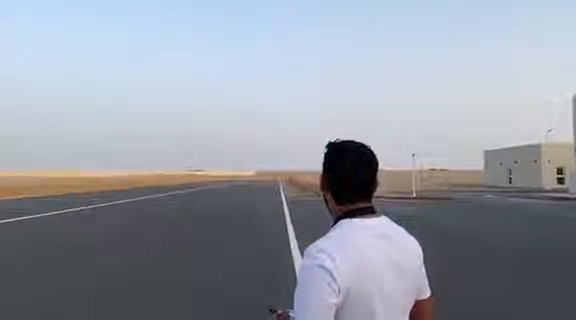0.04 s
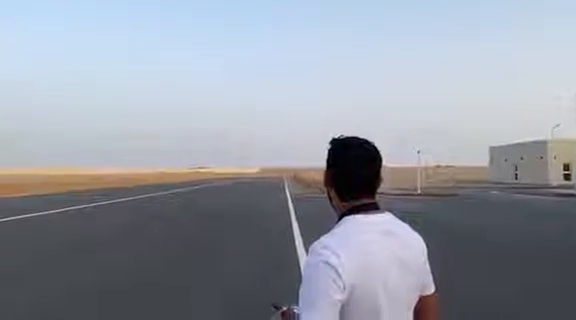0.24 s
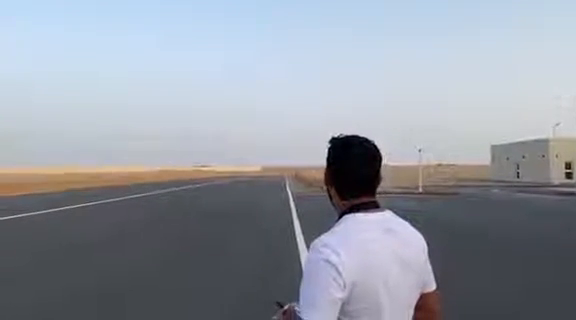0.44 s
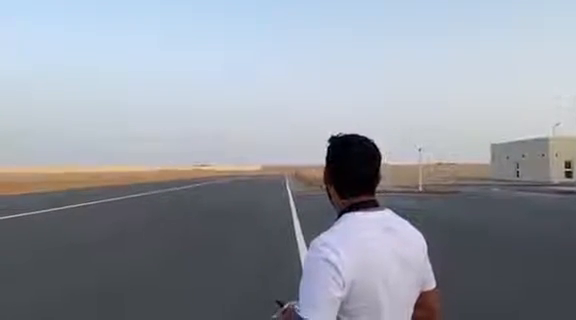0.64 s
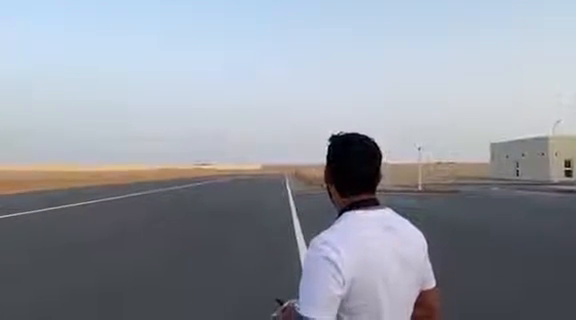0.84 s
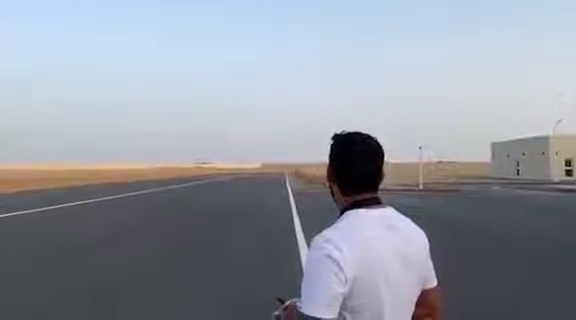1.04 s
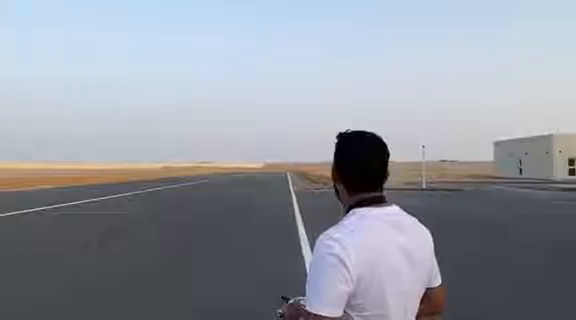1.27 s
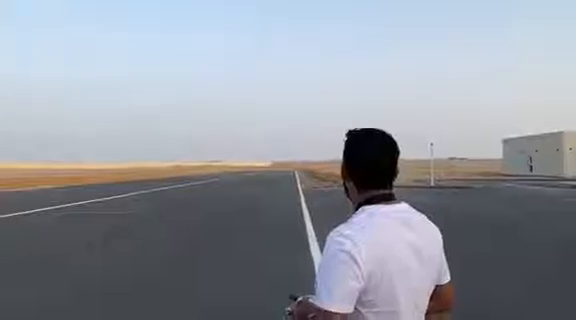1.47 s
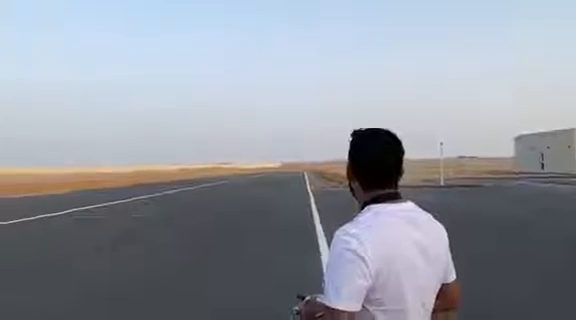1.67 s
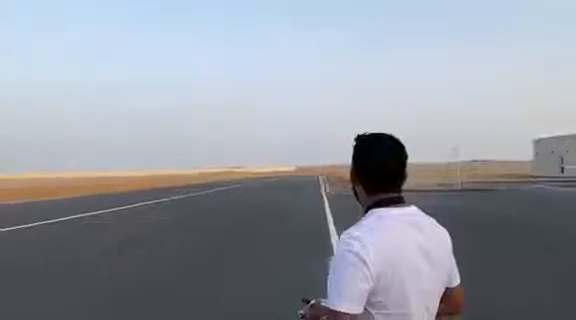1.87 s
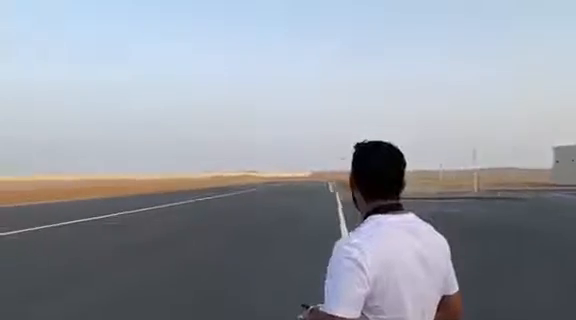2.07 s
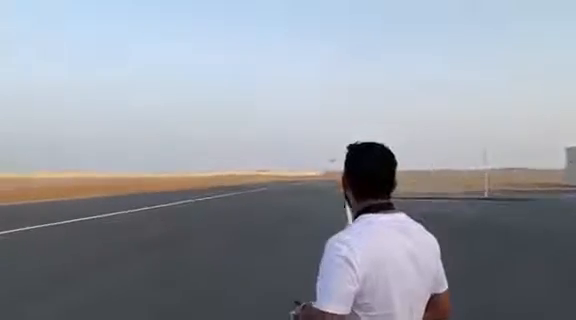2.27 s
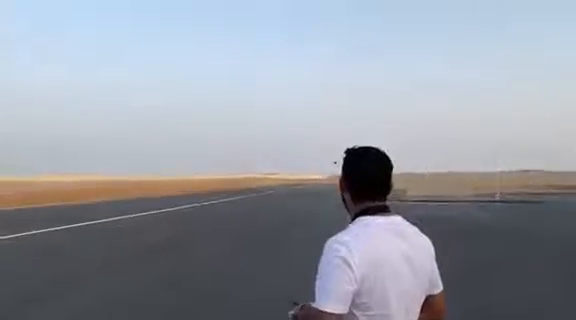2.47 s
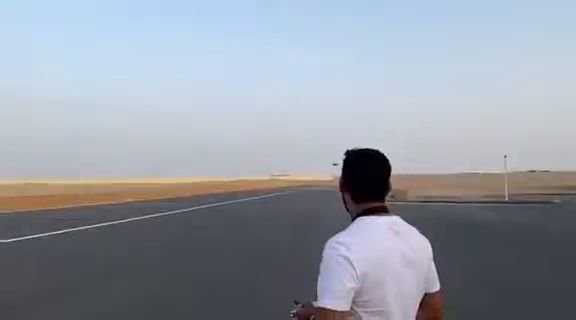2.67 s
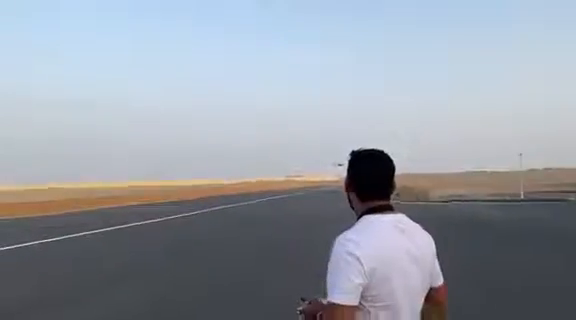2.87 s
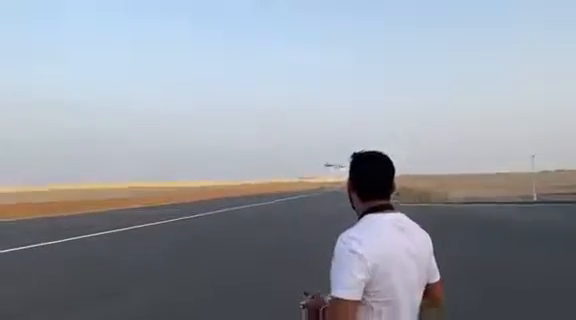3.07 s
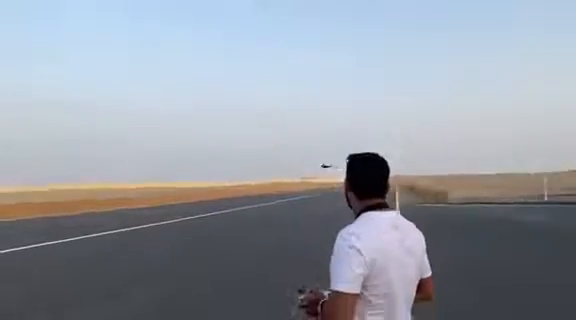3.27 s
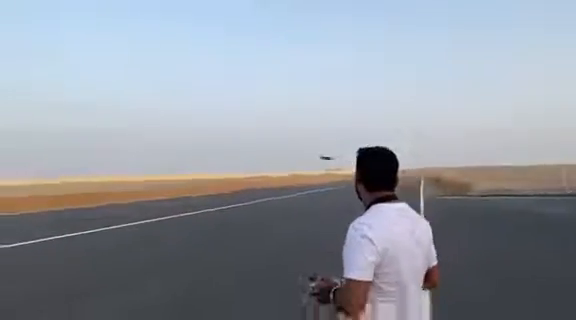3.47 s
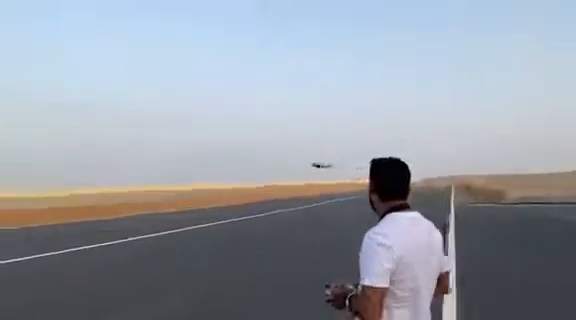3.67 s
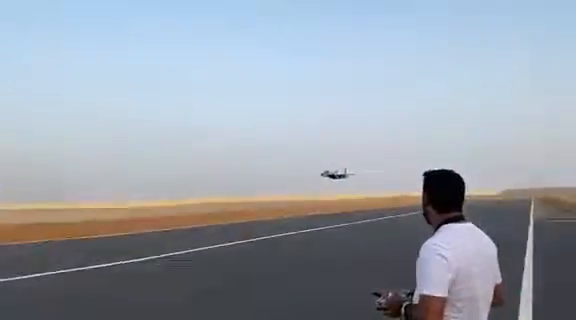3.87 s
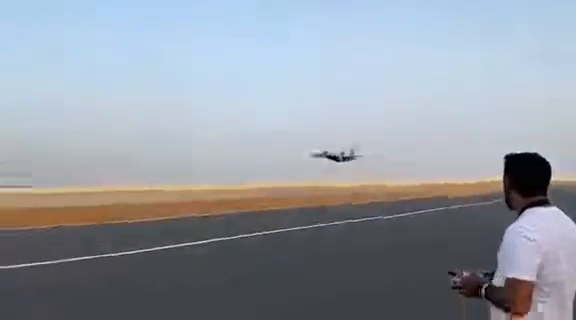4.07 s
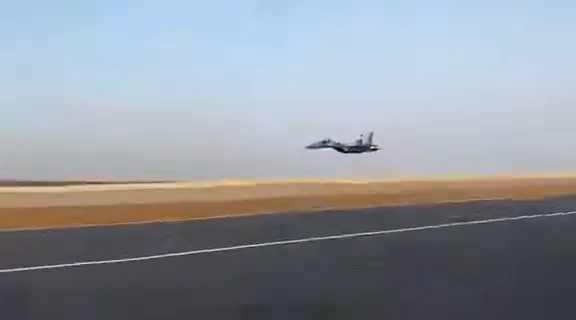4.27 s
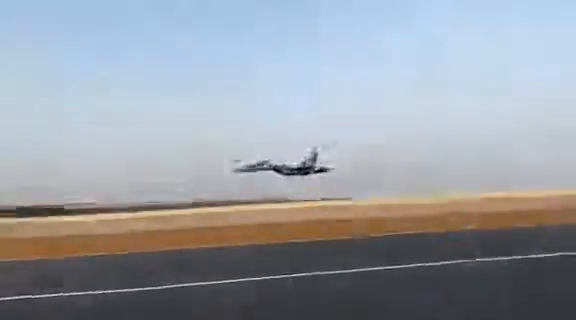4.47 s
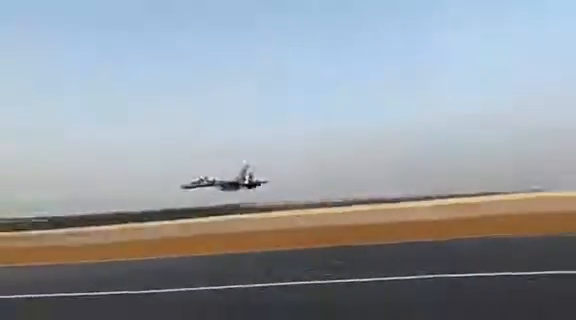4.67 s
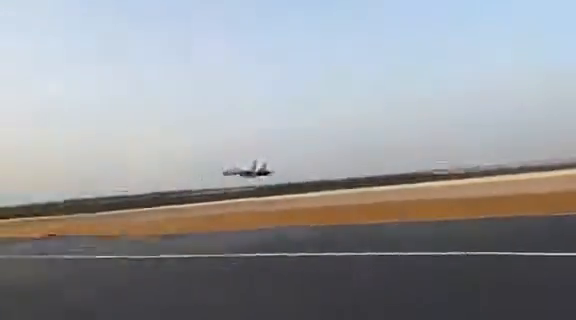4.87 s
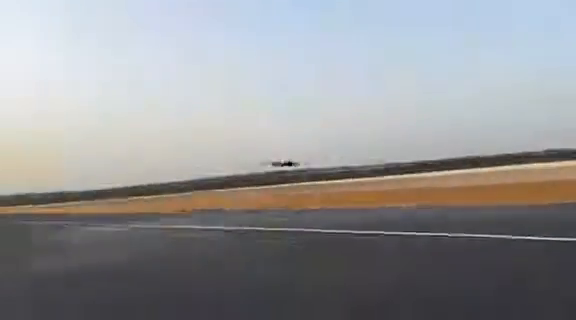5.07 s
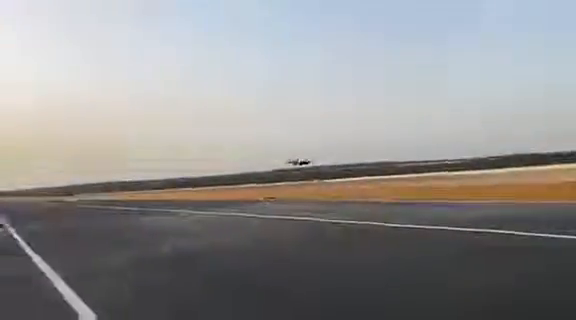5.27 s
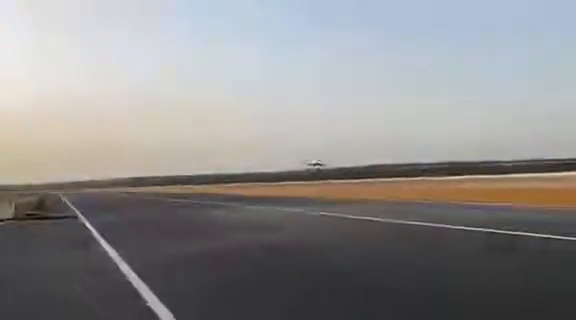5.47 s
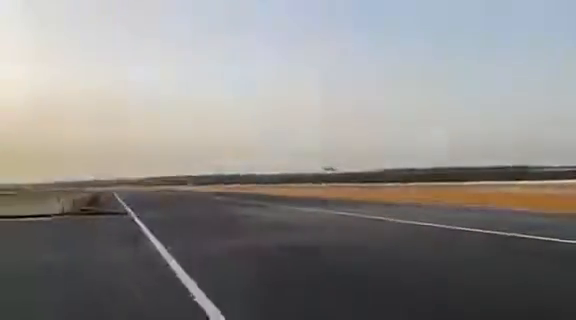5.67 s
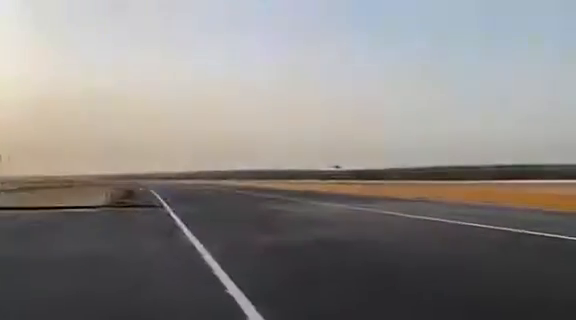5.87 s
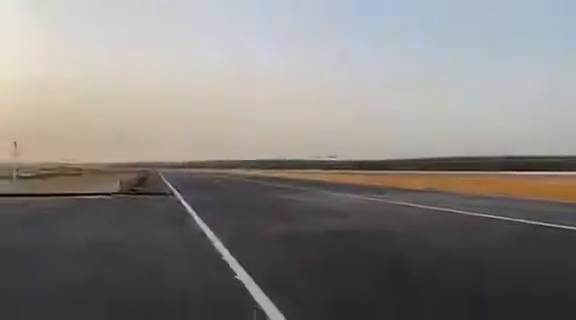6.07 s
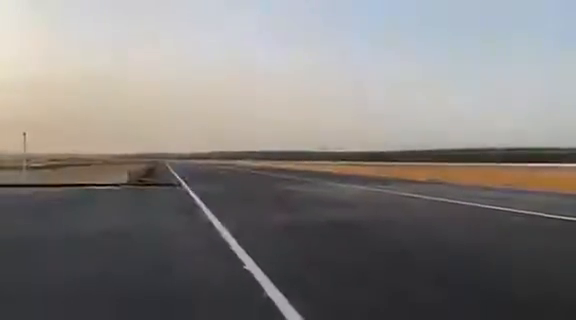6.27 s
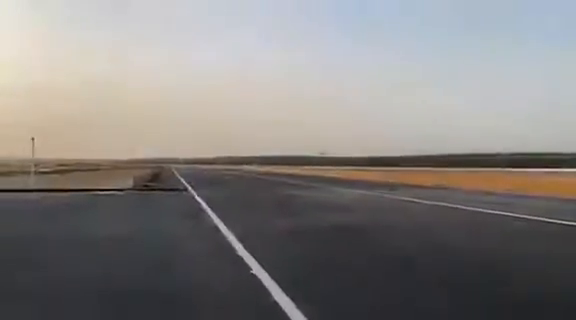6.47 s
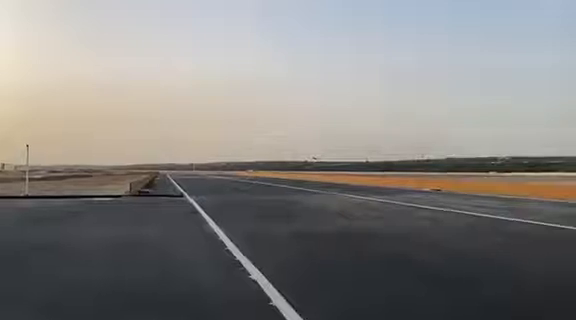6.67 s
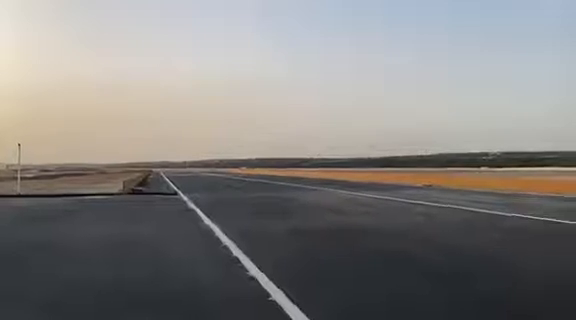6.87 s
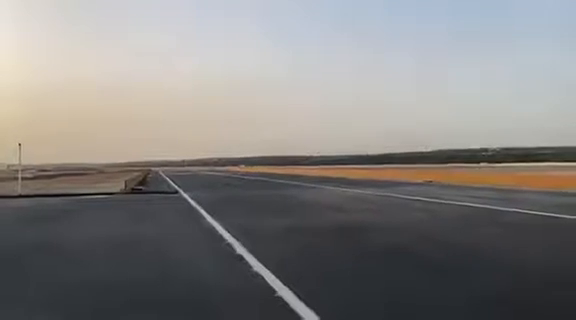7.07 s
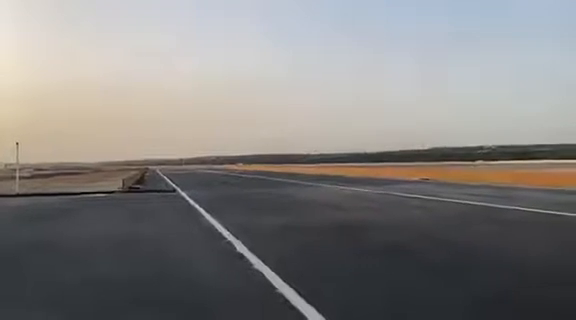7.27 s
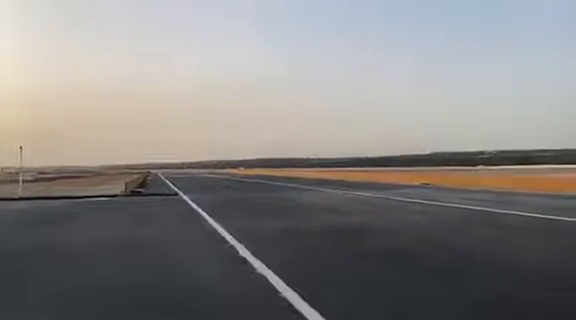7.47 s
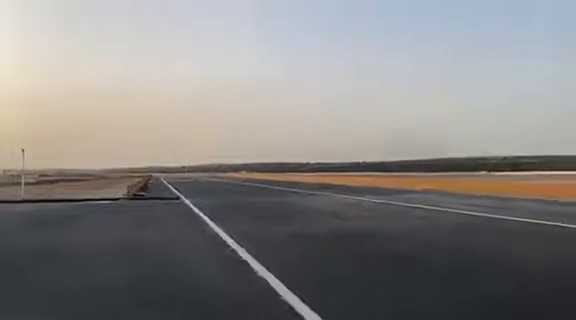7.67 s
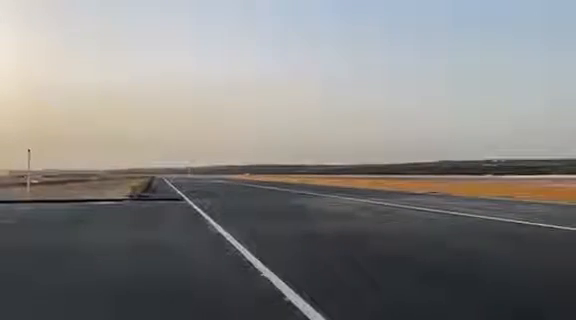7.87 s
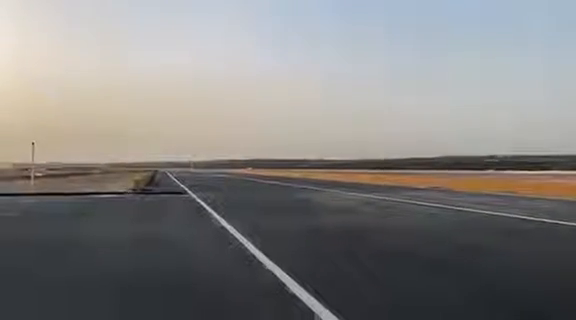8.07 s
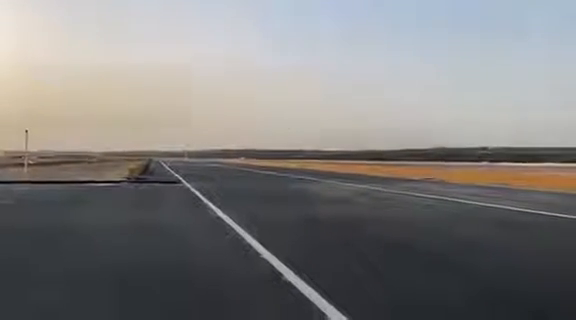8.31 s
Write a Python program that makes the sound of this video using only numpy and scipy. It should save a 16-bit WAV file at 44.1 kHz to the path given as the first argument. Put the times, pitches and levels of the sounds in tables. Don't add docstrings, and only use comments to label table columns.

```python
import sys
import numpy as np
from scipy import signal
from scipy.fft import dct
from scipy.io import wavfile
from scipy.ndimage import uniform_filter1d, map_coordinates

SR = 44100
rng = np.random.default_rng(int(sys.argv[2]) if len(sys.argv) > 2 else 0)


def digitize_waveform(pressure):
    field = np.atleast_2d(pressure).T
    bounded = np.clip(field, -1, 1)
    quanta = np.round(bounded * 32767).astype(np.int16)
    wavfile.write(sys.argv[1], SR, quanta)


def invert_db(x):
    u = np.asarray(x, float) / 20
    return 10 ** u


N = 367794


def rms_one(x):
    return x / np.sqrt(np.mean(x ** 2) + 1e-20)


def in_time(rows):
    s, *columns = np.transpose(rows)
    return [np.interp(np.arange(N) / SR, s, column) for column in columns]


def drift(rate_hz):
    coarse, run_in = 40, 2000
    r = np.exp(-2 * np.pi * rate_hz * coarse / SR)
    noise = rng.standard_normal(N // coarse + run_in + 2)
    slow = signal.lfilter([1], [1, -2 * r, r * r], noise)[run_in:]
    return np.interp(np.arange(N) / coarse, np.arange(len(slow)), rms_one(slow))


def band(x, low_hz, high_hz):
    return signal.sosfilt(signal.butter(2, [low_hz, high_hz], "band", fs=SR, output="sos"), x)


def patchy_noise(colour, low_hz, high_hz, slow_db, fast_db):
    count = int(np.ceil(3 * np.log2(high_hz / low_hz)))
    edges = np.geomspace(low_hz, high_hz, 1 + count)
    white, out = rng.standard_normal((2, N)), 0
    hz, db = np.transpose(colour)
    for k, (low, high) in enumerate(zip(edges, edges[1:])):
        level_db = np.interp(np.log(low * high) / 2, np.log(hz), db)
        flicker_db = slow_db * drift(5.2) + fast_db * drift(23)
        out = out + invert_db(level_db + flicker_db) * band(white[k % 2], low, high)
    return rms_one(out)


# frequency in Hz, density in dB per Hz.
WIND_SPECTRUM = [(15, -42), (25, -16.5), (45, -4), (75, 3), (129, -3), (168, -11.5), (300, -43), (390, -45),
                 (660, -120)]
# time in seconds, level in dB.
BREEZE_LEVEL = [(0, -46), (1.5, -48.5), (2.0, -54), (2.6, -49.5), (3.9, -44.5), (5.0, -46.5), (6.3, -42.5),
                (8.34, -46)]
# time of the peak in seconds, peak level in dB.
GUST_PEAKS = [(0.0, -36), (.23, -37.5), (.37, -40), (.49, -36.5), (.76, -39), (.88, -37), (.99, -38),
              (1.11, -36.5), (1.46, -40), (1.86, -42), (2.42, -37.5), (3.14, -41.5), (3.48, -44),
              (4.04, -40.5), (4.27, -39), (4.5, -41), (5.13, -39.5), (5.55, -49), (5.85, -45), (6.079, -36),
              (6.2, -36), (7.15, -44), (7.55, -44), (7.69, -39.5), (7.87, -35), (8.06, -34), (8.18, -48),
              (8.27, -46)]
GUST_RISE_S, GUST_FALL_S = 0.037, .06


def gust_envelope():
    peak_s, peak_db = np.transpose(GUST_PEAKS)[:, :, None]
    since = np.arange(N) / SR - peak_s
    shapes = np.exp(-np.abs(since) / np.where(since < 0, GUST_RISE_S, GUST_FALL_S))
    return (invert_db(peak_db) * shapes).max(axis=0)


def wind():
    gusts = gust_envelope()
    strength = np.hypot(invert_db(in_time(BREEZE_LEVEL)[0]), gusts)
    rumble = strength * patchy_noise(WIND_SPECTRUM, 25, 302, slow_db=-2.0, fast_db=-2.5)
    flap = rms_one(band(rng.standard_normal(N), 145, 480))
    return rumble + invert_db(-11) * gusts * flap


# start in seconds, peak in dB, pitch in Hz, 60 dB decay time in seconds.
GUST_THUMPS = [(0.051, -40, 87, 0.037), (0.218, -21, 138, 0.078), (0.354, -28.5, 71, 0.15),
               (0.466, -21, 69, 0.037), (0.489, -24, 82.5, 0.081), (0.722, -28.5, 200, 0.051),
               (1.102, -36, 94, 0.078), (1.139, -17.5, 68, 0.051), (1.189, -23, 67, 0.046),
               (2.419, -22, 140, 0.075), (6.101, -15, 294, 0.057)]


def gust_thumps():
    t = np.arange(int(.2 * SR)) / SR
    out = np.zeros(N)
    for s, db, hz, t60 in GUST_THUMPS:
        puff = rms_one(band(rng.standard_normal(len(t)), 125, 430))
        swing = np.sin(2 * np.pi * hz * t) + 0.44 * puff
        onset, decay = 1 - np.exp(-t / .004), invert_db(-60 * t / t60)
        at = round(s * SR)
        out[at:at + len(t)] += invert_db(db - 1.0) * onset * decay * swing
    return out


SPEED, SLOWING, NEAREST_M, NEAREST_S, SOUND = 44.4, 2.885, 18.08, 4.589, 343


def flight_path():
    u = np.arange(-7, 6, .001)
    along = SPEED * u - SLOWING * u * u / 2
    metres = np.hypot(along, NEAREST_M)
    heard = NEAREST_S + u + (metres - NEAREST_M) / SOUND
    doppler = np.gradient(u, heard)
    return in_time(np.c_[heard, metres, -along / metres, doppler, u])


# time in seconds, height in m, echo strength 0-1, treble share left 0-1.
ASPHALT_ECHO = [(0, 22.4, 0.35, 0), (.7, 14.9, 0.29, 0.04), (1.8, 4.74, 0.24, 0.14), (2.6, 3.3, 1, .6),
                (3.1, 3.48, 1, 0.65), (3.9, 3.15, .45, 0.2), (4.25, 3.2, .45, .5), (4.5, 3.05, 0.8, 0.2),
                (5.0, 3.16, 0.9, .65), (5.7, 3.6, .55, .15), (6.7, 4.47, 0.75, 0.4), (7.6, 5.2, 0.43, 0),
                (8.34, 9.3, 0.7, 0.47)]


def off_asphalt(x, split_hz, shimmer_ms):
    mic_height_m = 1.5
    height, strength, treble = in_time(ASPHALT_ECHO)
    lag_ms = 2000 * height * mic_height_m / (flight_path()[0] * SOUND)
    lag_ms = lag_ms + shimmer_ms * drift(6)
    echo = map_coordinates(x, [np.arange(N) - lag_ms * SR / 1000], order=3, mode="nearest")
    low = signal.sosfiltfilt(signal.butter(2, split_hz, fs=SR, output="sos"), echo)
    reflected = low + np.clip(treble, 0, .75) * (echo - low)
    return (x + np.clip(strength, 0, .66) * reflected) / np.sqrt(1.5)


# centre in seconds, half length in seconds, centre in Hz, width in Hz, level in
# dB.
ROAR_SWELLS = [(0.857, 0.18, 5750, 1130, -58.5), (1.35, 0.22, 5600, 1700, -54),
               (1.568, 0.11, 4180, 1040, -45.5), (2.028, 0.089, 2430, 1200, -41.5),
               (2.978, 0.091, 4900, 790, -43), (3.335, 0.18, 480, 217, -36),
               (3.897, 0.15, 255, 90, -29), (3.861, 0.26, 393, 159, -30.5),
               (4.499, 0.38, 362, 125.7, -27), (3.05, 0.2, 2000, 510, -47),
               (3.953, 0.13, 1090, 360, -34.5), (4.243, 0.32, 2960, 802, -31),
               (4.41, 0.3, 211.5, 81.5, -24.5), (4.502, .2, 720, 255, -21.5),
               (4.805, 0.23, 1452, 327, -25.5), (4.809, 0.1, 5180, 1600, -34.5),
               (4.909, 0.083, 2060, 583, -27), (4.912, 0.061, 183, 87, -29.5),
               (5.702, 0.28, 2295, 890, -41), (7.804, .5, 190.6, 113, -41.5),
               (6.496, 0.76, 1898, 379, -39.5), (6.613, 0.13, 3500, 2970, -38),
               (7.22, 0.038, 3500, 3700, -37.5), (7.7, 0.6, 5690, 813, -48)]


def swells():
    t, white, out = np.arange(N) / SR, rng.standard_normal(N), 0
    for s, half, hz, width_hz, db in ROAR_SWELLS:
        bell = np.exp(-((t - s) / half) ** 2)
        out = out + invert_db(db) * bell * rms_one(band(white, hz - width_hz / 2, hz + width_hz / 2))
    return out


# frequency in Hz, density in dB per Hz.
JET_SPECTRUM = [(59, -34), (100, -13), (291, -6), (403, -9), (688, -4), (1070, -1), (1270, -7), (1530, -7),
                (1890, -8.5), (2570, -18), (3910, -14.5), (5830, -18.5), (6290, -19), (7330, -22.5),
                (9580, -52), (12500, -82), (21100, -120)]
PART_EDGES_HZ = 130, 450, 2300, 5300, 7600, 10500
# time in seconds, roar in dB as at the nearest distance, brightness in dB.
ENGINE_EFFORT = [(0, -21.5, -15.5), (.6, -22.5, -2), (1.1, -20.5, -3.5), (1.55, -19.5, -4),
                 (2.05, -18.5, 5), (2.8, -21, 2.5), (3.35, -17.5, 0.5), (3.8, -21.5, 4.5), (4.2, -21, 0.5),
                 (4.55, -20, 0.5), (4.92, -17.5, 5), (5.12, -17.5, -1), (5.6, -19.5, -1), (6.3, -18, 0.5),
                 (6.62, -14.5, 0), (7.2, -14, 2.5), (7.75, -15.5, 0), (8.34, -13.5, 5.5)]
# level in dB against the roar, air loss in dB per 100 m,
# dB louder ahead than abeam, share of the brightness.
JET_PARTS = [
    (-11.5, -2, -2, .1),
    (0, 0.5, 0.5, 0),
    (-10, 0.5, 0, 0.73),
    (-12.5, 9.5, 1.5, 1.4),
    (-20, 16.5, 6, 0.79),
]


def jet_noise():
    metres, ahead, _, _ = flight_path()
    roar_db, bright_db = in_time(ENGINE_EFFORT)
    roar_db = roar_db - 20 * np.log10(metres / NEAREST_M)
    slow_dbs, fast_dbs = [2.1, 0.3, 0.52, 0.24, 0.24], [1.1, 0.51, 1.8, 2.7, 1.8]
    out = 0
    for part, low, high, slow, fast in zip(JET_PARTS, PART_EDGES_HZ, PART_EDGES_HZ[1:], slow_dbs, fast_dbs):
        db, loss, lobe, share = part
        level_db = roar_db + db - loss * metres / 100 + lobe * ahead + share * bright_db
        out = out + invert_db(level_db) * patchy_noise(JET_SPECTRUM, low, high, slow, fast)
    return out


def tone(hz, db, wobble_hz, twinkle_db):
    phase = 2 * np.pi * np.cumsum(hz + wobble_hz * drift(15)) / SR
    return np.sqrt(2) * invert_db(db + twinkle_db * drift(10)) * np.sin(phase)


# time in seconds, shaft level in dB, blade level in dB.
FIRST_ENGINE = [(0, -74, -105), (1.7, -64, -88), (2.55, -58, -83), (3.4, -61, -75), (3.78, -46, -68),
                (4.2, -42, -51), (4.5, -39, -46), (4.8, -38, -46), (5.15, -43, -47), (5.4, -62, -50),
                (5.55, -70, -58), (5.75, -80, -55), (6.2, -100, -80), (6.4, -130, -130)]


def first_turbine():
    blade_per_shaft, beat_hz, beat_db, crest_s = 3.775, 3.2, 3.5, 4.5
    metres, _, doppler, since = flight_path()
    shaft_db, blade_db = in_time(FIRST_ENGINE)
    blade_hz = (8266.5 + 52.9 * since) * doppler
    beat = np.cos(2 * np.pi * beat_hz * (np.arange(N) / SR - crest_s))
    shaft_db = shaft_db + beat_db * np.sqrt(NEAREST_M / metres) * beat
    return tone(blade_hz / blade_per_shaft, shaft_db + 3, 5, 2) + tone(blade_hz, blade_db, 13, 3)


# time in seconds, pitch in Hz.
SECOND_SHAFT_PITCH = [(1.7, 2525), (1.95, 2498), (2.2, 2483)]
# time in seconds, level in dB.
SECOND_SHAFT_LEVEL = [(1.6, -80), (1.85, -60), (1.95, -62), (2.08, -49), (2.2, -60), (2.3, -86)]
# time in seconds, pitch in Hz.
SECOND_BLADE_PITCH = [(5.7, 7710), (6.1, 7680), (6.24, 7730), (6.31, 7822), (6.45, 8170), (6.59, 8620),
                      (6.73, 9200), (6.85, 9700)]
# time in seconds, level in dB.
SECOND_BLADE_LEVEL = [(5.6, -130), (5.75, -75), (5.88, -64), (6.1, -70), (6.35, -66), (6.5, -65),
                      (6.66, -59), (6.75, -63), (6.85, -130)]


def second_turbine():
    shaft = tone(*in_time(SECOND_SHAFT_PITCH), *in_time(SECOND_SHAFT_LEVEL), 4.6, 2.2)
    blade = tone(*in_time(SECOND_BLADE_PITCH), *in_time(SECOND_BLADE_LEVEL), 12, 3)
    return shaft + blade


def scene():
    roar = off_asphalt(jet_noise() + swells(), split_hz=1900, shimmer_ms=.02)
    return (wind() + gust_thumps() + roar + first_turbine() + second_turbine())[None]


# time in seconds, share turned away 0-1.
HANDSET_TURN = [
    (4.0, 0),
    (5.3, 1),
]
# frequency in Hz, width in Hz, depth facing 0-1, depth turned away 0-1.
PORT_RESONANCES = [(856, 83, 0.43, 0.39), (1003.5, 250, 0.078, 0.37), (1865, 420, 0.2, 0.011),
                   (2232, 330, 0.073, 0.24), (2844, 230, 0.53, 0.29), (3283, 360, 0.35, .5),
                   (4740, 580, 0.017, 0.22), (5317, 740, 0.76, 0.32), (6090, 360, 0.35, 0.67),
                   (8190, 800, 0.37, 0.27)]


def port(x):
    turned = np.clip(in_time(HANDSET_TURN)[0], 0, 1)
    for hz, width_hz, facing, away in PORT_RESONANCES:
        r = np.exp(-np.pi * width_hz / SR)
        poles = [1, -2 * r * np.cos(2 * np.pi * hz / SR), r * r]
        ring = signal.lfilter(np.array([1, 0, -1]) * (1 - r * r) / 2, poles, x)
        depth = np.clip(facing + turned * (away - facing) + .15 * drift(2.5), 0, .75)
        x = x - depth * ring
    return x


# frequency in Hz, dB under the loudest band, dB under the neighbouring bands.
STEP_DEPTH = [(250, 60, 14), (600, 60, 1), (1500, 50, -2), (3000, 44, -4), (5500, 41, -5), (7200, 35, -4)]
STEP_DEPTH_TOP = [(7930, 22, -5), (9500, 22, 0.5), (9400, 22, -3)]


def starve(x, budget_db, tile_db):
    hop, lead, width = 1024, 160, 8
    frames = (N + lead) // hop + 2
    window = np.sin(np.pi * (np.arange(2 * hop) + .5) / (2 * hop))
    padded = np.pad(x, (lead + hop, frames * hop - N - lead))
    lapped = padded[np.arange(frames)[:, None] * hop + np.arange(2 * hop)] * window
    a, b, c, d = np.split(lapped, 4, axis=1)
    lines = dct(np.hstack([-c[:, ::-1] - d, a - b[:, ::-1]]), type=4, norm="ortho")
    bands = (lines ** 2).reshape(frames, -1, width).mean(axis=2) + 1e-20
    around_db = 10 * np.log10(uniform_filter1d(uniform_filter1d(bands, size=5, axis=1), size=3, axis=0))
    hz, top_db, near_db = np.transpose(list(STEP_DEPTH) + list(STEP_DEPTH_TOP))
    centres = (np.arange(hop // width) + .5) * width * SR / (2 * hop)
    under_top, under_near = np.interp(centres, hz, top_db), np.interp(centres, hz, near_db)
    luck = budget_db * rms_one(uniform_filter1d(rng.standard_normal((frames, 1)), size=2, axis=0))
    loudest_db = around_db.max(axis=1, keepdims=True)
    step_db = np.maximum(loudest_db - under_top + luck, around_db - under_near + .2 * luck)
    step = np.repeat(invert_db(step_db + tile_db * rng.standard_normal(bands.shape)), width, axis=1)
    lines = np.sign(lines) * step * np.floor(np.abs(lines) / step + .4054)
    lines[:, int(9720 * 2 * hop / SR):] = 0
    u, v = np.split(dct(lines, type=4, norm="ortho"), 2, axis=1)
    unfolded = np.hstack([v, -v[:, ::-1], -u[:, ::-1], -u]) * window
    first, second = np.split(unfolded, 2, axis=1)
    return (first[1:] + second[:-1]).ravel()[lead:lead + N]


def top_cut(x):
    return signal.sosfilt(signal.butter(12, 9730, fs=SR, output="sos"), x)


def record(dry):
    thin = starve(port(dry[0]), budget_db=5.0, tile_db=2.5)
    return top_cut(thin[None])


dry = scene()
out = record(dry)
digitize_waveform(out)
```